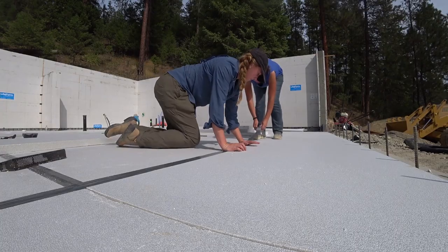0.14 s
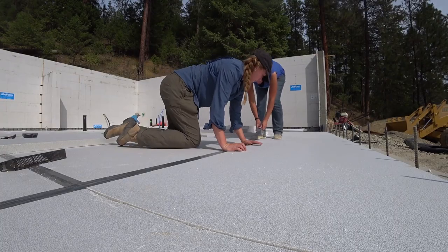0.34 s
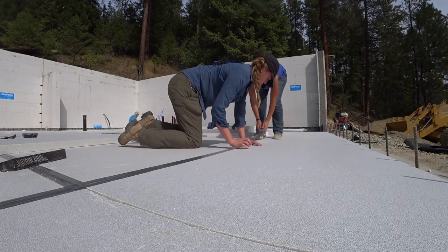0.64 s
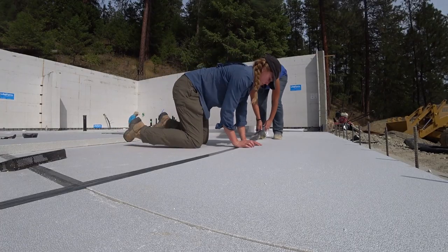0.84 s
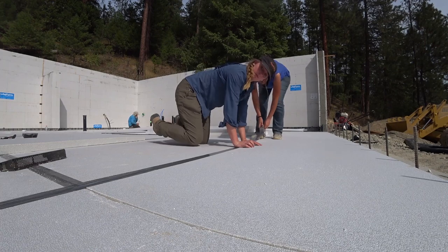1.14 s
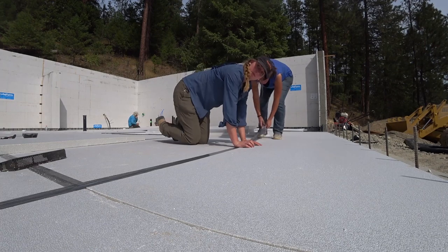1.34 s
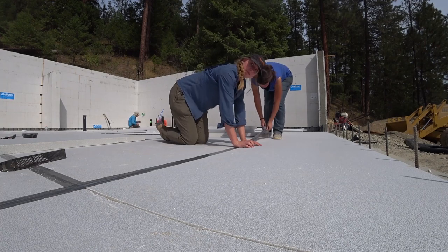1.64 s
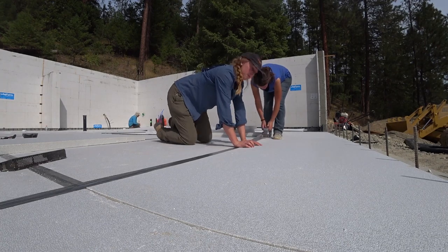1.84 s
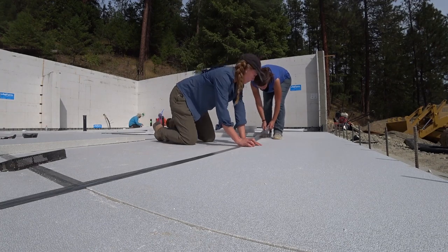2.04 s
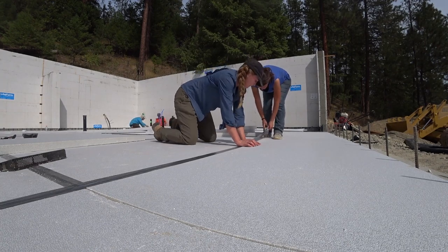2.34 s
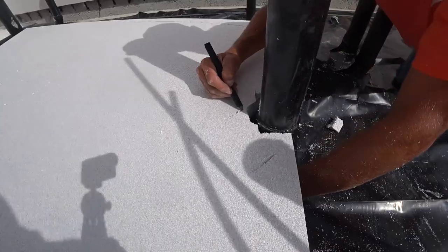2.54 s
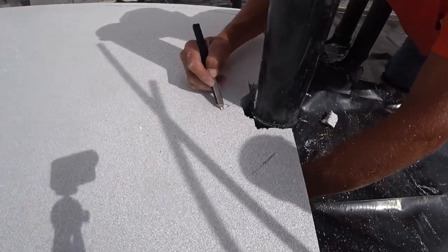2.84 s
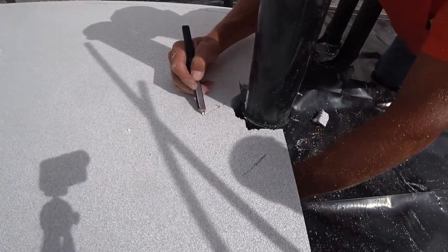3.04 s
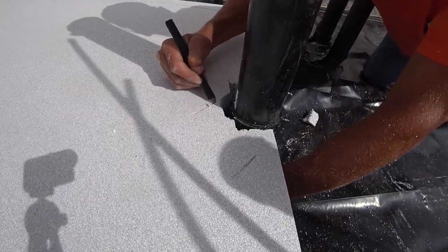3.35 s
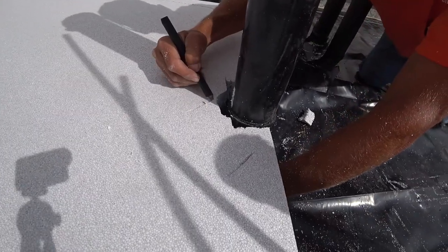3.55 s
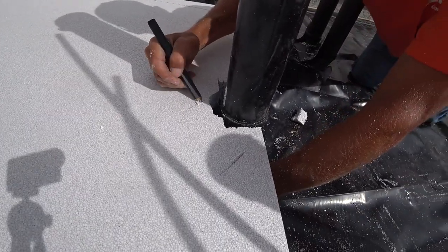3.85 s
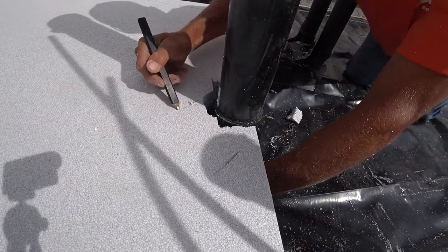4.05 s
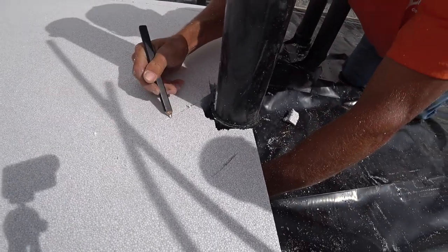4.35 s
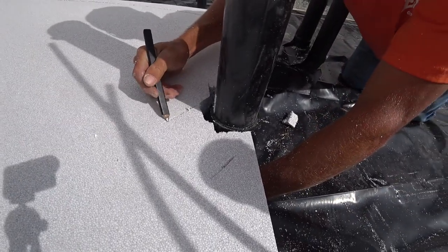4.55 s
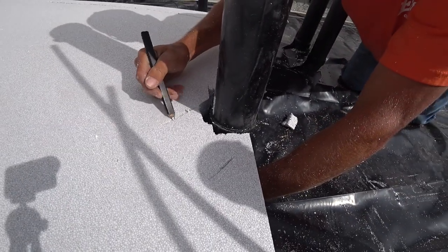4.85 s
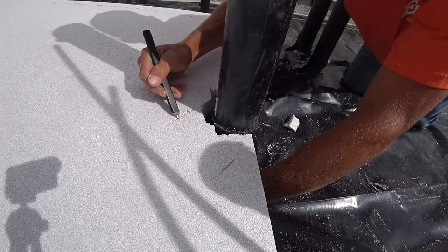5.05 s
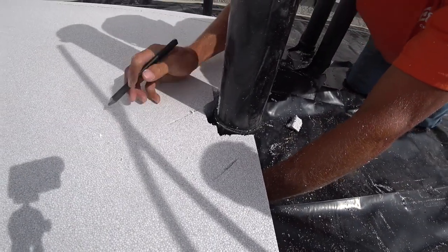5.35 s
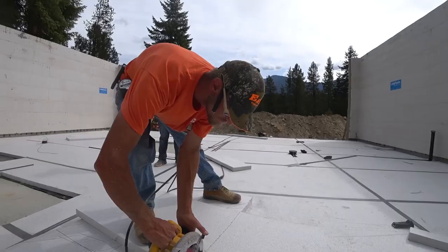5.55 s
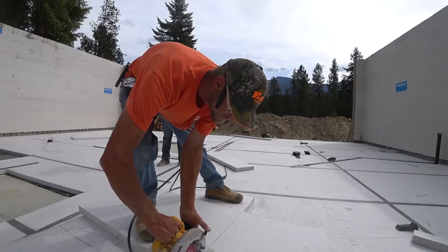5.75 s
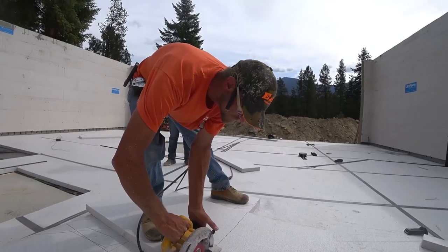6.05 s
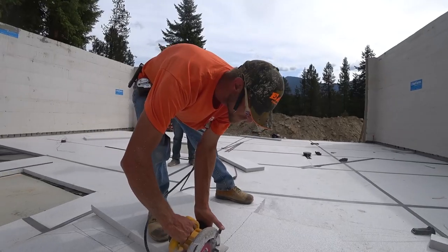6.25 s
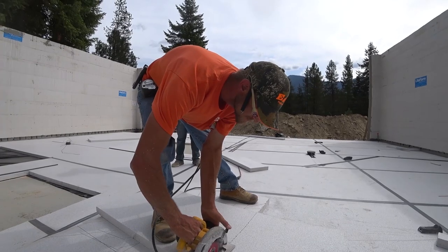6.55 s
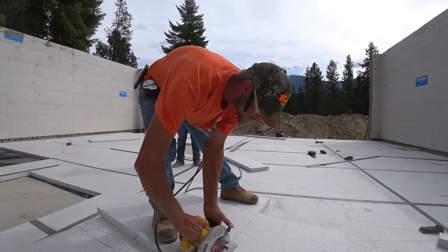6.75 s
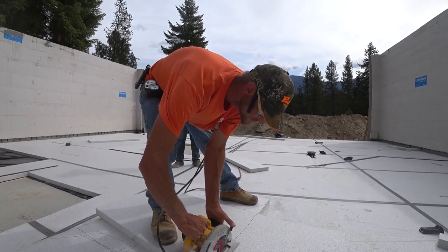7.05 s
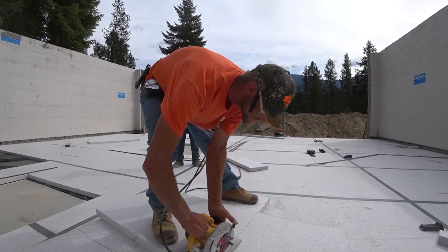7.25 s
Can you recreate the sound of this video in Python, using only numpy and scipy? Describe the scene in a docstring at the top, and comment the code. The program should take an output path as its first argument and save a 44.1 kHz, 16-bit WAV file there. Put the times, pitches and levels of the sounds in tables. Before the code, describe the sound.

On an open building site, a heavy foam board is shoved over other boards in short, juddering, raspy bursts. Then, close to the microphone, a pencil and hand hiss and scrape across foam, with low handling rumble and scattered dull knocks. Faint outdoor air lies underneath. Suddenly a corded circular saw takes over, cutting through foam with a loud, steady hiss and motor whine until the end.

```python
"""Foam boards on a building site

Three scenes. A heavy foam board is shoved over others and judders in stick-slip bursts. Close by,
a pencil and hands rub a board that rumbles and is knocked now and then. Last, a corded circular saw
runs up to speed and hisses through foam, its gear and blade whining."""
import sys
import numpy as np
from scipy import signal
from scipy.fft import rfft, irfft, next_fast_len
from scipy.io import wavfile
from scipy.ndimage import uniform_filter1d

SR = 44100
rng = np.random.default_rng(int(sys.argv[2]) if len(sys.argv) > 2 else 0)


def log_audio(samples):
    """Write samples as a 16-bit WAV file to the path given in sys.argv[1]."""
    # one column per channel
    frames = np.atleast_2d(samples).T
    # limit to full scale, then quantise
    limited = np.clip(frames, -1, 1)
    pcm = np.round(limited * 32767).astype(np.int16)
    wavfile.write(sys.argv[1], SR, pcm)


N = 325899
T = np.arange(N) / SR
NEAR_S, SAW_ON_S = 2.582, 5.583  # cuts to the near board and to the saw

# fader ride of the site air: time_s, level_db
AIR_RIDE = [(0, -55.5), (.3, -40), (1.0, -52), (1.2, -51), (1.5, -48.5), (1.9, -46), (2.2, -44), (2.6, -46),
            (2.75, -61), (3.0, -49), (3.5, -47), (4.0, -47.5), (4.4, -53), (4.7, -51), (5.1, -48),
            (5.6, -55)]
# EQ of the air: freq_hz, gain_db
AIR_EQ = [(18, -25), (30, 6), (56, -3), (81, -12.5), (251, -8.5), (596, -15), (1130, -19.5), (1490, -29),
          (1600, -22), (2260, -29), (11000, -35), (14300, -67), (22000, -120)]

# a list per shove; the board slips at each whole step: time_s, steps_travelled, level_db, treble_db
SHOVE_PATHS = [
    [(.1334, 0, -28, 1), (.1483, 1, -22, 0), (.1841, 4, -23, 1), (.1983, 6, -26, 0), (.2164, 8, -25, -1)],
    [(.2956, 0, -28, -7), (.3095, 2, -21, -8), (.3347, 5, -25, -2), (.3543, 7, -40, 0)],
    [(.392, 0, -28, 0), (.4101, 2, -19, -8), (.4236, 4, -26, -3), (.4496, 7, -26, -3), (.4676, 9, -30, 2),
     (.4872, 10, -27, 0), (.5096, 12, -25, -3), (.5351, 13, -35, 9), (.549, 14, -31, -2)],
    [(.5921, 0, -33, 3)],
    [(.6205, 0, -35, -3), (.6457, 3, -20, -12), (.6665, 5, -23, -12), (.679, 6, -39, -11)],
    [(.7124, 0, -31, -6), (.7269, 1, -20, -13), (.7488, 3, -27, -7), (.7769, 5, -25, -7),
     (.8036, 7, -30, -1), (.8144, 8, -32, -1), (.8469, 13, -28, -2), (.892, 16, -28, 0),
     (.9264, 19, -27, -1), (.9494, 22, -30, 2), (.9597, 23, -33, 2), (.9809, 24, -33, 4)],
    [(1.0763, 0, -34, -1)],
    [(1.2276, 0, -33, -5), (1.2373, 1, -25, -3), (1.2502, 2, -25, -2), (1.2637, 4, -24, -4),
     (1.292, 7, -27, -3), (1.3297, 11, -26, -4), (1.3464, 12, -27, -1)],
    [(1.4188, 0, -35, -4)],
    [(1.5519, 0, -33, -3), (1.5643, 1, -34, 7), (1.5873, 3, -26, -2), (1.6086, 6, -26, -4),
     (1.6409, 8, -28, 4), (1.6624, 10, -29, 2), (1.6851, 11, -33, 6)],
    [(1.7478, 0, -31, -3), (1.7607, 1, -32, 1), (1.7733, 2, -26, -5), (1.7856, 3, -29, -3)],
    [(1.9336, 0, -32, -8), (1.9505, 2, -30, -3)],
    [(1.9872, 0, -30, -1), (1.9971, 1, -22, -7), (2.0237, 4, -25, -5), (2.0625, 7, -24, -3),
     (2.0736, 8, -31, 6), (2.0873, 9, -25, -4), (2.1176, 11, -25, -1), (2.1366, 12, -28, -6)],
    [(2.2423, 0, -37, -6), (2.2632, 2, -26, -11), (2.2739, 3, -27, -6), (2.2827, 4, -38, -1)],
    [(2.3608, 0, -41, -4), (2.3726, 1, -32, -4), (2.3865, 3, -28, -3), (2.4105, 5, -25, -7),
     (2.4352, 8, -21, -6), (2.4887, 13, -20, -7), (2.5083, 15, -25, -4), (2.5208, 16, -21, -11),
     (2.529, 17, -28, -11), (2.5437, 18, -24, -3), (2.5749, 19, -27, -13)],
]
# resonances favoured by each shove's grip: low_hz, middle_hz, high_hz, extra_thud_db
SHOVE_GRIPS = [(750, 2160, 2940, 0), (760, 2100, 2900, 0), (725, 2060, 4500, 0), (915, 2200, 3600, -9),
               (753, 1870, 2600, -1.5), (743, 1960, 2860, -1), (730, 1420, 5070, -3.5),
               (880, 1510, 2940, 1), (1040, 2120, 2660, 0), (820, 2100, 2900, 1), (770, 1500, 2940, 1.5),
               (930, 1430, 2600, 0), (750, 2000, 4600, 1), (850, 2060, 2920, -2.5), (837, 1950, 2700, -1)]
# low modes of the shoved board: pitch_hz, width_hz, gain_db
THUD_MODES = [(125, 160, -9.5), (231.4, 88, -3), (409, 50, 1), (703, 175, 3), (831, 130, 0.5),
              (1120, 89, -3.5)]
# its middle modes: pitch_hz, width_hz, gain_db
MID_MODES = [(1610, 140, 1.5), (1920, 280, -5.5), (1953, 244, 2), (2450, 470, -4)]
# its bright crack: pitch_hz, width_hz, gain_db
CRACK_MODES = [(3010, 130, -6), (3680, 230, 0), (4700, 3000, -4), (6000, 1120, -3.5), (6460, 670, -9),
               (10670, 2400, -15)]
# EQ of the rasp between slips: freq_hz, gain_db
RASP_EQ = [(53, -46), (90, -12), (346, 7), (528, -14), (822, -5), (1280, -8), (2030, -15), (2640, -23),
           (2920, 10.5), (3230, -6.5), (11000, -18), (14300, -60), (22000, -120)]
# boards and knees sliding between shoves: start_s, hold_s, level_db, change_db, rise_s, fall_s
SLIDE_MOVES = [(0, 0.16, -45, -2, .05, 0.058), (.55, .001, -27.5, -2.5, .01, 0.038),
               (.59, .001, -34, 0, 0.054, 0.025), (1.076, .001, -38, -6, 0.035, .03),
               (1.05, 0.073, -38.5, -2.5, 0.017, .025), (1.725, .001, -42, -2, .07, 0.018),
               (1.81, .001, -31.5, 0, 0.083, 0.025), (1.82, 0.082, -40.5, -16, .05, .02),
               (2.145, .001, -40, 0, .01, 0.042), (2.29, .001, -58, -2, .01, .03)]
# EQ of the slides: freq_hz, gain_db
SLIDE_EQ = [(120, -1), (200, 1.5), (778, 0), (1200, 1), (1420, 4), (1570, 0), (2020, 2.5), (3520, -4.5),
            (11000, -6), (14300, -41), (22000, -120)]
# low cut that thins the deep bass of the shoving scene: freq_hz, gain_db
SHOVE_LOW_CUT_EQ = [(30, -21), (70, -0.5), (110, 0), (20000, 0)]

# pencil and hand on foam: start_s, hold_s, hiss_db, change_db, rise_s, fall_s, extra_scrape_db
STROKE_MOVES = [(2.616, .001, -36, 0.5, .06, .04, -3.5), (2.796, .03, -36.5, -5, 0.031, .04, -6),
                (2.845, 0.036, -37, 4, .03, 0.036, -1.5), (2.918, .001, -22.5, -0.5, 0.021, 0.03, 4),
                (2.934, .001, -35.5, 0, .05, 0.094, 1.5), (3.128, .03, -55, -2, .06, .05, -2),
                (3.194, 0.093, -37, 2.5, 0.035, 0.032, -2.5), (3.368, .001, -30, 1, 0.041, 0.04, -3),
                (3.389, 0.03, -40, -1.5, .04, 0.024, 1), (3.449, .001, -52, 3, .02, 0.14, -5),
                (3.586, .001, -49, -1.5, 0.035, 0.049, 6), (3.682, .001, -31.5, 3.5, .04, 0.014, -1),
                (3.721, .001, -37.5, -2, 0.043, 0.12, 2.5), (3.897, 0.012, -49, 2, 0.039, .08, 3),
                (3.984, 0.027, -33.5, -7.5, 0.07, 0.038, 0.5), (4.055, 0.13, -54.5, 3.5, .015, .1, 4),
                (4.3, .01, -50, 0, 0.22, .035, 1.5), (4.39, 0.058, -37, -4.5, 0.021, 0.014, 0),
                (4.518, .001, -31.5, 0.5, 0.038, 0.053, 0.5), (4.599, 0.032, -36, 2.5, 0.011, 0.082, 4),
                (4.715, 0.039, -37, 4, .03, 0.033, 1), (4.821, 0.058, -33, -6, 0.038, 0.013, 1.5),
                (4.925, 0.04, -37, 5, 0.015, .03, -1), (5.029, 0.04, -34.5, -3, 0.042, 0.07, -2),
                (5.126, .001, -49, 0, .04, .04, -6), (5.183, .14, -53.5, 4.5, 0.036, 0.09, -1),
                (5.377, 0.059, -33.5, 13, 0.026, 0.048, 2), (5.473, 0.1, -40, -4.5, .05, .04, 2)]
# airy top of a stroke: freq_hz, gain_db
HISS_EQ = [(1470, -44), (2500, -18), (3560, -6), (3830, -5), (4160, -4.5), (4620, -0.5), (4970, -0.5),
           (6870, 2), (8910, 2), (9900, 3), (11000, 2), (14300, -34), (22000, -120)]
# midrange scrape of a stroke: freq_hz, gain_db
SCRAPE_EQ = [(240, -31), (400, 2), (778, 0), (1040, -2.5), (1410, -3), (2240, -3.5), (4000, -6.5),
             (5200, -18), (8800, -120)]
# handling rumble, before the strokes push it up or down: time_s, level_db
RUMBLE_RIDE = [(2.6, -78), (2.83, -50), (2.98, -32), (3.08, -42.5), (3.35, -53), (3.63, -43), (4.23, -50),
               (4.46, -44.5), (4.59, -38), (4.84, -44), (4.91, -43.5), (5.16, -48), (5.41, -47.5),
               (5.53, -41), (5.6, -46)]
# EQ of the rumble: freq_hz, gain_db
RUMBLE_EQ = [(12, -37), (20, -8), (48, -10), (97, -2.5), (140, -6.5), (266, -12), (323, -7.5), (428, -37),
             (612, -23), (700, -62), (910, -56), (1540, -120)]
# knocks on the near board: start_s, peak_db, hardness_db_per_octave, deepest_mode_db, relative_tick_db
KNOCK_HITS = [(2.857, -28, -2, -2, -20), (2.877, -22, -1, -12, -20), (2.912, -5, -1, -16, -19),
              (2.922, -10, 2, -7, -25), (2.931, -14, 1, -16, -33), (2.976, -17.5, -6, -19, -30),
              (3.21, -48, 2, -1, -20), (3.242, -29, -9.5, -5.5, -5), (3.285, -35, 3, -4, 0),
              (3.563, -18.5, -2, -7, -22), (3.583, -32, 1, 3, 4), (4.405, -34, -2, 18, -20),
              (4.599, -14.5, 2.5, 12, -6), (4.648, -33, 11, 2, -20), (4.94, -33, -5, 9, -20),
              (5.354, -22, 3, 0, -23), (5.55, -32, -1.5, 2, -25)]
# modes of the near board: pitch_hz, gain_db, t60_s
PANEL_MODES = [(78.5, -5.5, 0.53), (145, -9, 0.14), (200, 1.5, 0.08), (261.4, 6.5, 0.045),
               (344, -3.5, 0.084), (434, 1, 0.046), (550, 0.5, 0.039), (636, -17, 0.039), (867, -16, 0.049)]

# speed of the blade: time_s, turns_per_s
BLADE_SPEED = [(5.58, 73.2), (5.67, 74.1), (5.97, 76.9), (6.12, 77.5), (6.27, 77.95), (6.42, 78.1),
               (6.57, 78.4), (6.72, 78.45), (7.0, 78.48), (7.17, 78.4), (7.32, 78.0), (7.39, 77.7)]
# tones of the blade, 40 being the gear mesh: blade_multiple -> level_db, waver_width_hz
BLADE_PARTIALS = {1: (-57, 4.9), 2: (-50, 1.9), 3: (-47, 19), 4: (-47.5, 4.1), 5: (-43.5, 15),
                  9: (-38.5, 2.4), 11: (-54, 3.7), 13: (-41, 8), 16: (-41.5, 10), 20: (-44.5, 4.7),
                  39: (-44.5, 8.5), 40: (-32, 2), 41: (-38, 5.9), 42: (-44.5, 6.2), 60: (-33, 23),
                  80: (-37, 30), 90: (-36.5, 35), 119.8: (-43, 37), 120.25: (-29, 15)}
# tones of the motor: motor_multiple -> level_db, waver_width_hz
MOTOR_PARTIALS = {1: (-41, 12), 2: (-49, 13), 3: (-46, 3.4), 5: (-59, 6.1), 6: (-39.5, 10), 8: (-40, 4.1),
                  12: (-40, 30), 19: (-43, 6.4)}
# fader ride of blade and motor tones: time_s, gain_db
WHINE_RIDE = [(5.58, -1), (5.9, -1.5), (6.1, 2.5), (6.4, -1), (6.6, 1), (6.9, 1.5), (7.15, 1), (7.39, -1)]
# hiss of blade and chips: freq_hz, gain_db
CUT_HISS_EQ = [(1000, -35), (1700, -19), (2000, -6.5), (2890, -4), (3100, -3.5), (3350, -4), (3770, -5.5),
               (4210, -2.5), (4550, 0.5), (5160, -3), (5660, -1.5), (6170, 2), (8700, -4), (9480, -5.5),
               (11000, -7.5), (14300, -43), (22000, -120)]
# body of the cut: freq_hz, gain_db
CUT_BODY_EQ = [(18, -68), (30, -40), (91, -38), (146, -9.5), (184, -16.5), (274, -12.5), (385, -3.5),
               (504, -7.5), (684, 2), (804, -6), (912, -1.5), (1110, -7), (1280, -4), (1770, -9),
               (2200, -11.5), (2860, -36), (4840, -120)]
# gliding whistles in the kerf: start_s, end_s, start_hz, end_hz, width_hz, level_db
KERF_WHISTLES = [(5.568, 6.06, 6080, 5870, 40, -30), (5.575, 5.9, 7960, 8220, 90, -33),
                 (5.85, 5.915, 7250, 6100, 220, -24), (5.89, 6.017, 6240, 5120, 400, -25),
                 (5.7, 5.86, 7750, 7800, 400, -28), (6.07, 6.16, 4700, 4530, 300, -36),
                 (6.345, 6.41, 4730, 4500, 350, -22.5), (6.387, 6.46, 7300, 6100, 300, -26),
                 (6.02, 6.14, 6940, 7200, 80, -26.5), (7.078, 7.22, 6860, 6330, 300, -32),
                 (7.269, 7.39, 7000, 7030, 80, -30)]

# stereo width, a list per scene: freq_hz, side_over_mid_db
WIDTH_EQS = [(60, -24), (170, -18), (490, -14), (1420, -12.5), (4060, -9.5), (11700, -9)], [(60, -26),
             (170, -15.5), (490, -15), (1420, -4.5), (4060, -8), (11700, -13)], [(60, -27), (170, -20),
             (490, -12), (1420, -8), (4060, -10), (11700, -13)]
# balance, a list per scene: freq_hz, left_over_right_db
BALANCE_EQS = [(60, -0.5), (220, 0), (840, 0), (3120, -1), (11700, -1)], [(60, 1), (220, 0), (840, 2.5),
               (3120, 2.5), (11700, 0)], [(60, 1.5), (220, 0.5), (840, 2.0), (3120, 2), (11700, 0.0)]


def gain_of(db):
    """Decibels to a factor."""
    return 10 ** (np.asarray(db) / 20)


def unit_rms(x):
    """Scales to rms 1."""
    return x / np.sqrt(np.mean(x ** 2) + 1e-20)


def equalise(x, eq):
    """Applies an EQ curve drawn on a log-frequency axis."""
    points_hz, db = np.transpose(eq)
    size = next_fast_len(N)
    hz = np.fft.rfftfreq(size, 1 / SR)
    response = gain_of(np.interp(np.log(hz + 1), np.log(points_hz + 1), db))
    return irfft(rfft(x, size) * response, size)[:N]


def ride_db(points):
    """A fader ride, silent outside its points."""
    return np.interp(T, *np.transpose(points), left=-120, right=-120)


def resonate(x, hz, width_hz):
    """A gliding resonance: shifts the pitch down to zero, smooths, and shifts back."""
    carrier = np.exp(2j * np.pi * np.cumsum(hz) / SR)
    pole = np.exp(-np.pi * width_hz / SR)
    return 2 * (carrier * signal.lfilter([1 - pole], [1, -pole], x / carrier + 1e-18)).real


def grainy(eq, grain_db, grain_s, patchy_db=0):
    """Noise that flickers like tearing foam beads; patchy_db lets hollows come and go in its colour."""
    flicker = unit_rms(uniform_filter1d(rng.standard_normal(N), int(grain_s * SR)))
    spectrum = signal.stft(rng.standard_normal(N), nperseg=512)[2]
    patches = uniform_filter1d(rng.standard_normal(spectrum.shape), size=3, axis=0)
    patches = unit_rms(uniform_filter1d(patches, size=9, axis=1))
    noise = signal.istft(spectrum * gain_of(patchy_db * patches), nperseg=512)[1][:N]
    return unit_rms(equalise(noise * gain_of(grain_db * flicker), eq))


def gestures(moves, rest_db):
    """Level in dB of moves that rise, hold and fall, and which move leads at each moment."""
    start, hold, db, change_db, rise, fall = np.transpose(moves)[:6, :, None]
    hop, fade_db = 44, 25  # a rise or a fall spans fade_db
    t = T[::hop]
    away = np.maximum(np.maximum((start - t) / rise, (t - start - hold) / fall), 0)
    each_db = db + change_db * np.clip((t - start) / hold, 0, 1) - fade_db * away
    level_db = np.interp(T, t, np.maximum(each_db.max(axis=0), rest_db))
    return level_db, np.repeat(each_db.argmax(axis=0), hop)[:N]


def site_air():
    """A low bed of open air that swells and sinks."""
    return gain_of(ride_db(AIR_RIDE)) * grainy(AIR_EQ, grain_db=.54, grain_s=.018)


def walls(x, t60_s, wet_db):
    """Adds a short noisy tail from slab and foam walls."""
    t = np.arange(SR // 3) / SR
    tail = rng.standard_normal(len(t)) * gain_of(-60 * t / t60_s) * (t > .004)
    tail = signal.lfilter([1], [1, -.6], tail)  # foam swallows the treble
    return x + gain_of(wet_db) * signal.oaconvolve(x, tail / np.linalg.norm(tail))[:N]


def slides():
    """Boards and knees brush over foam between the shoves."""
    level_db, _ = gestures(SLIDE_MOVES, rest_db=-120)
    return gain_of(level_db) * grainy(SLIDE_EQ, grain_db=1.2, grain_s=.0027, patchy_db=2.5)


def slips():
    """Time, level, treble and grip of every slip: the board breaks loose once a step."""
    shoves = []
    for path, grip in zip(SHOVE_PATHS, SHOVE_GRIPS):
        time_s, travel, level_db, treble_db = np.transpose(path)
        steps = np.arange(travel[-1] + 1)
        per_slip = [np.interp(steps, travel, column) for column in (time_s, level_db, treble_db)]
        shoves.append([*per_slip, *np.outer(grip, np.ones(len(steps)))])
    return np.concatenate(shoves, axis=1)


def favoured(modes, grip_hz, draw):
    """The pitch each slip favours: its grip, or else some mode, strong ones more often."""
    grip_share = .6
    hz, _, db = np.transpose(modes)
    odds = np.cumsum(gain_of(3 * db))
    pick = np.clip((draw - grip_share) / (1 - grip_share), 0, 1)
    return np.where(draw < grip_share, grip_hz, hz[np.searchsorted(odds / odds[-1], pick)])


def burst(t, rise_s, fall_s):
    """An envelope that swells up to time zero and dies after it."""
    return np.where(t < 0, np.exp(-(t / rise_s) ** 2), np.exp(-t / fall_s))


def kick(modes, grip_hz, draw, db, rise_s, fall_s, boost_db):
    """Each slip sends a puff of noise through the board's modes and one favoured resonance."""
    t, hz = np.arange(-300, 1748) / SR, np.fft.rfftfreq(2048, 1 / SR)
    puff = rng.standard_normal((len(db), len(t))) * burst(t, rise_s, fall_s)
    puff[:, 300] -= 9  # the snap itself pulls the air one way
    # no two slips load the board alike
    load, detune = rng.standard_normal((len(db), len(modes), 2)).T[..., None]
    body = 0
    for k, (mode_hz, width_hz, mode_db) in enumerate(modes):
        offset_hz = hz - mode_hz * (1 + .033 * detune[k])
        body += (-1) ** k * gain_of(mode_db + 2 * load[k]) / (1 + 2j * offset_hz / width_hz)
    peak_hz = favoured(modes, grip_hz, draw)[:, None]
    body += gain_of(boost_db) / (1 + 2j * (hz - peak_hz) / (.12 * peak_hz))
    low_cut = hz ** 4 / (hz ** 4 + 100 ** 4)  # a board radiates no deep bass
    sound = irfft(rfft(puff) * body * low_cut)
    sound /= np.linalg.norm(sound, axis=1)[:, None]
    return sound * gain_of(db)[:, None] * np.sqrt(.012 * SR)


def slip_rasp(time_s, level_db):
    """A gritty rasp swells around each slip and fills the gaps."""
    train = np.zeros(N)
    np.add.at(train, (time_s * SR).astype(int), gain_of(level_db))
    shape = burst(np.arange(-400, 2000) / SR, rise_s=.0034, fall_s=.008)
    envelope = signal.oaconvolve(train, shape)[400:N + 400]
    return envelope * grainy(RASP_EQ, grain_db=2.3, grain_s=.0016)


def shoved_board():
    """Stick-slip judder: each slip kicks the board's modes, and a bright crack follows."""
    jitter_s, spread_db = .0006, 2
    time_s, level_db, treble_db, low_hz, mid_hz, high_hz, extra_db = slips()
    late, strong, heavy, bright = rng.standard_normal((len(time_s), 4)).T
    low, mid, high = rng.random((len(time_s), 3)).T
    time_s += jitter_s * late
    level_db += spread_db * strong
    thud_db = -26.5 + extra_db + .27 * (level_db + 26.5) + spread_db * heavy  # follows only in part
    crack_db = level_db + treble_db + spread_db * bright - 2
    thud = kick(THUD_MODES, low_hz, low, thud_db, rise_s=.0014, fall_s=.0022, boost_db=3.5)
    ring = kick(MID_MODES, mid_hz, mid, level_db - 1.7, rise_s=.0019, fall_s=.0018, boost_db=3.3)
    crack = kick(CRACK_MODES, high_hz, high, crack_db, rise_s=.0015, fall_s=.0031, boost_db=-.18)
    judder = np.zeros(N)
    samples = ((time_s - .0015) * SR).astype(int)[:, None] + np.arange(-300, 1748)
    np.add.at(judder, samples, thud + ring + np.roll(crack, 30, axis=1))
    return walls(judder + slip_rasp(time_s, level_db - 11), t60_s=.11, wet_db=-15.5)


def rubbing():
    """Pencil and hand hiss and scrape on foam; the handled board rumbles into the microphone."""
    hiss_db, leading = gestures(STROKE_MOVES, rest_db=-66.5)  # a hand rests on it between strokes
    extra_db = uniform_filter1d(np.transpose(STROKE_MOVES)[-1][leading], size=200)
    scrape_db = extra_db - 50.5 + .56 * (hiss_db + 50.5)  # follows the hiss only in part
    rumble_db = ride_db(RUMBLE_RIDE) + .48 * np.maximum(hiss_db + 49.5, -10)  # firm strokes shake more
    hiss = gain_of(hiss_db) * grainy(HISS_EQ, grain_db=2.3, grain_s=.0051, patchy_db=2)
    scrape = gain_of(scrape_db) * grainy(SCRAPE_EQ, grain_db=1.5, grain_s=.0039, patchy_db=2)
    rumble = gain_of(rumble_db) * grainy(RUMBLE_EQ, grain_db=3.7, grain_s=.019)
    return (hiss + scrape) * (T > NEAR_S) * (T < SAW_ON_S) + rumble


def knocks():
    """Each knock ticks and rings the near board's modes, tuned a little differently every time."""
    out, t = np.zeros(N), np.arange(SR // 4) / SR
    for start_s, peak_db, hardness, deepest_db, tick_db in KNOCK_HITS:
        ring = np.zeros(len(t))
        for k, (hz, mode_db, t60_s) in enumerate(PANEL_MODES):
            chance = rng.uniform(-1, 1)
            db = mode_db + hardness * np.log2(hz / 200) + deepest_db * (k == 0) + 2.05 * chance
            ring -= gain_of(db - 60 * t / t60_s) * np.sin(2 * np.pi * hz * (1 + .098 * chance) * t)
        ring *= 1 - np.exp(-t / .001)  # foam gives: a soft attack
        tick = gain_of(tick_db) * rng.standard_normal(len(t)) * np.exp(-t / .00059)
        out[int(start_s * SR):][:len(t)] += gain_of(peak_db) * (ring / abs(ring).max() + tick)
    return out


def saw_cut(blade_hz):
    """Blade and chips hiss over a darker body; the feed is nearly even."""
    sway_db = .7 * unit_rms(uniform_filter1d(rng.standard_normal(N), int(.04 * SR)))
    bite = 1 + .03 * np.cos(2 * np.pi * np.cumsum(blade_hz) / SR)  # the blade bites once a turn
    hiss = gain_of(-18 + sway_db) * grainy(CUT_HISS_EQ, grain_db=1.6, grain_s=.0015, patchy_db=.65)
    body = gain_of(-25.5) * grainy(CUT_BODY_EQ, grain_db=.92, grain_s=.01, patchy_db=1.5)
    return hiss[-len(bite):] * bite + body[-len(bite):]


def saw_whine(t, blade_hz):
    """Wavering tones of blade, gear and motor track the blade's speed."""
    gear_ratio = 40 / 7  # motor turns per blade turn
    tones = [(k * blade_hz, *row) for k, row in BLADE_PARTIALS.items()]
    tones += [(k * gear_ratio * blade_hz, *row) for k, row in MOTOR_PARTIALS.items()]
    fader_db = np.interp(t, *np.transpose(WHINE_RIDE))
    out = np.zeros(len(t))
    for hz, db, width_hz in tones:
        clean = np.sqrt(2) * np.cos(2 * np.pi * np.cumsum(hz) / SR)
        fuzzy = unit_rms(resonate(rng.standard_normal(len(t)), hz, width_hz))
        purity = np.exp(-(width_hz / 16) ** 2)  # narrow tones stay steady, broad ones are all waver
        out += gain_of(db + fader_db) * (purity * clean + np.sqrt(1 - purity ** 2) * fuzzy)
    return out


def kerf_whistles(t):
    """Narrow bands of noise swell, glide and fade in the cut."""
    out = np.zeros(len(t))
    for start, end, start_hz, end_hz, width_hz, db in KERF_WHISTLES:
        hz = np.interp(t, [start, end], [start_hz, end_hz])
        swell = np.sin(np.pi * np.clip((t - start) / (end - start), 0, 1)) ** .38
        band = resonate(rng.standard_normal(len(t)), hz, width_hz)
        whistle = unit_rms(swell * resonate(band, hz, width_hz))
        out += gain_of(db) * whistle * np.sqrt((end - start) * SR / len(t))
    return out


def circular_saw():
    """The saw runs up to speed in the foam: cut, whine and whistles over mains hum."""
    t = T[int(SAW_ON_S * SR):]
    blade_hz = np.interp(t, *np.transpose(BLADE_SPEED))
    hum = gain_of(-51.5) * np.sqrt(2) * np.sin(2 * np.pi * 120 * t)
    saw = saw_cut(blade_hz) + saw_whine(t, blade_hz) + kerf_whistles(t) + hum
    return np.pad(saw, (N - len(t), 0))


def stereo(mid, width_eq, balance_eq):
    """Two close ports: the side is the mid a quarter turn late, its phases scattered by reflections."""
    spectrum = signal.stft(mid, nperseg=128)[2]
    scatter_rad = 1.12 * rng.standard_normal(spectrum.shape)
    side = signal.istft(spectrum * -1j * np.exp(1j * scatter_rad), nperseg=128)[1][:N]
    side = equalise(side * np.linalg.norm(mid) / np.linalg.norm(side), width_eq)
    return np.array([equalise(mid + sign * side, [(hz, sign * db / 2) for hz, db in balance_eq])
                     for sign in (1, -1)])


def scene():
    """The shoves, then the near board, both over the site air; then the saw."""
    air = site_air()
    shoving = equalise((shoved_board() + slides() + air) * (T < NEAR_S), SHOVE_LOW_CUT_EQ)
    near = rubbing() + knocks() + air * (T >= NEAR_S)
    return sum(map(stereo, (shoving, near, circular_saw()), WIDTH_EQS, BALANCE_EQS))


def record(dry):
    """Soft overload on the peaks, then a steep high cut."""
    ceiling, cutoff_hz = .46, 11030
    soft = ceiling * np.tanh(dry / ceiling)
    high_cut = signal.firwin(1501, cutoff_hz, window=("kaiser", 6), fs=SR)
    return signal.oaconvolve(soft, high_cut[None], "same")


dry = scene()
out = record(dry)
log_audio(out)
```